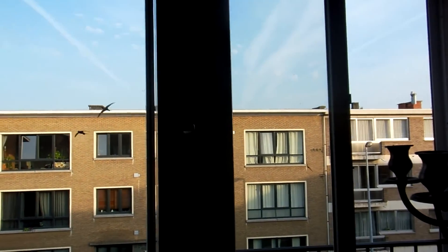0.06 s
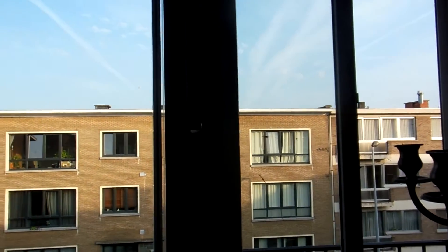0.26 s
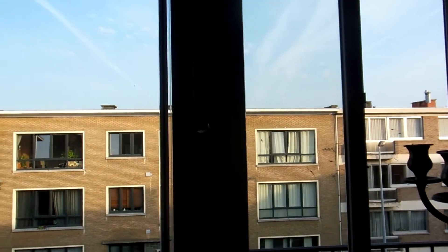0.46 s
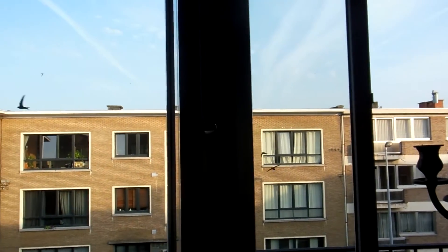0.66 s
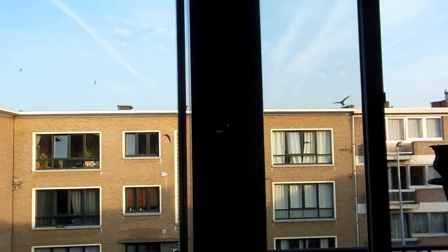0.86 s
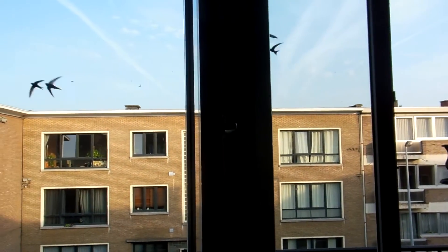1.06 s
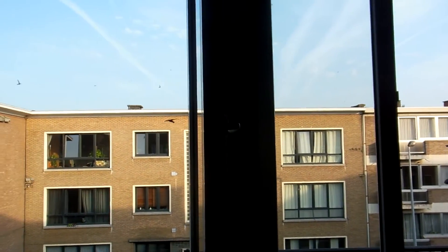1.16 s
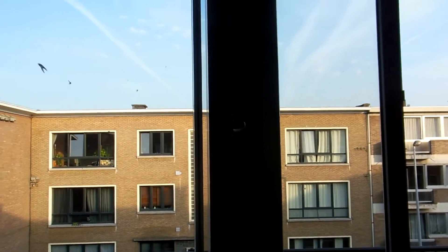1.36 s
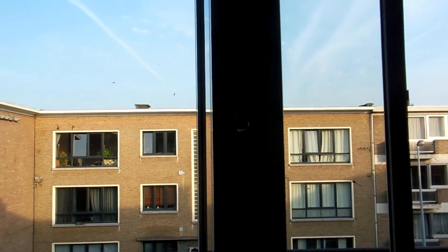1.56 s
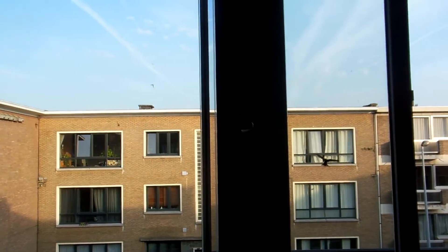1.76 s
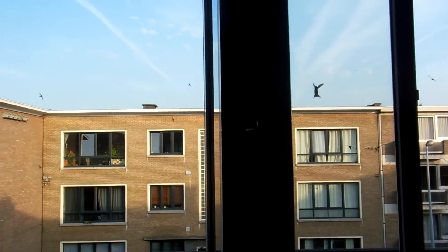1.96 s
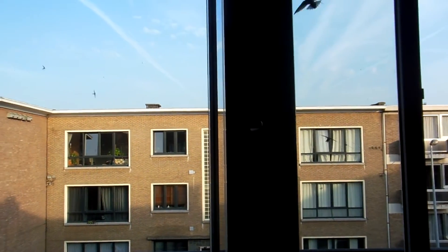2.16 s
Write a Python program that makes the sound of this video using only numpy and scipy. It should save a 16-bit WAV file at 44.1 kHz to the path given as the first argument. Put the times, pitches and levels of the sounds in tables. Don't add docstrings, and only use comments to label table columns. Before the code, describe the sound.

Shrill swift calls glide upward and turn rough, loudest in the first half second, fainter midway, strong again after, then a rapid chittering trill and a faint last cry. Stereo microphone at a window, echoing street, quiet steady rumble.

```python
import sys
import numpy as np
from scipy import signal
from scipy.fft import rfft, irfft
from scipy.io import wavfile
from scipy.ndimage import uniform_filter1d

SR = 44100
rng = np.random.default_rng(int(sys.argv[2]) if len(sys.argv) > 2 else 0)


def convert_level_to_amplitude(level_db):
    exponent = np.asarray(level_db, float) / 20
    return 10 ** exponent


def put_to_file(sound):
    columns = np.atleast_2d(sound).T
    safe = np.clip(columns, -1, 1)
    whole_steps = np.round(safe * 32767)
    wavfile.write(sys.argv[1], SR, whole_steps.astype(np.int16))


N = 97020
LEAD_IN = SR // 2
LEFT_RIGHT = np.array([[1], [-1]])


def level(x, db):
    return x * convert_level_to_amplitude(db) / np.sqrt(np.mean(x ** 2))


def walk(rate_hz, size):
    hold = int(SR / rate_hz)
    steps = np.repeat(rng.standard_normal(SR // 6), hold)[:size]
    return 1.3 * uniform_filter1d(uniform_filter1d(steps, hold), hold)


def hiss():
    band = signal.butter(2, [3800, 9300], "band", fs=SR)
    return level(signal.lfilter(*band, rng.standard_normal((2, N))), -64)


# (frequency [Hz], level [dB])
HUM = [
    (330, -71.5),
    (650, -71),
    (1402, -63),
    (13190, -77),
]


def machines(t):
    out = 0
    for hz, db in HUM:
        gain = np.sqrt(2) * convert_level_to_amplitude(db + 1.65 * walk(12.1, N))
        out = out + gain * np.sin(2 * np.pi * hz * t + .6 * walk(9.12, N))
    return out


# (frequency [Hz], density [dB per Hz])
TOWN = [(15, -61), (25, -20), (300, -9.5), (341, -9), (567, -5.5), (631, -5.5), (867, -7.5), (1350, -8.5),
        (4000, -17), (5200, -17), (8800, -120)]
# (frequency [Hz], correlation [0-1])
ALIKE = [
    (30, .92),
    (80, .86),
    (160, .73),
    (300, .71),
    (600, .78),
    (1300, .6),
    (2900, .36),
    (6000, .05),
]


def rumble():
    log_hz = np.log(np.arange(N // 2 + 1) * SR / N + 1)

    def read(rows):
        hz, value = np.transpose(rows)
        return np.interp(log_hz, np.log(hz), value)

    alike = read(ALIKE)
    mid, side = rfft(rng.standard_normal((2, N)))
    pair = np.sqrt(1 + alike) * mid + np.sqrt(1 - alike) * side * LEFT_RIGHT
    fall = convert_level_to_amplitude(-9 * np.clip(log_hz - np.log(TOWN[-1][0]), 0, None))
    noise = level(irfft(pair * convert_level_to_amplitude(read(TOWN)) * fall, N), -51.5)
    left_db, flicker_db = 0.9, 0.85
    return noise * convert_level_to_amplitude(flicker_db * walk(5, N)) * convert_level_to_amplitude(left_db * LEFT_RIGHT / 2)


def street(x):
    early_s, slap_s, slap_spread_s = .014, .114, .002
    tail_t60_s, treble_t60_s, treble_hz, tail_rise_s = 1.205, 1, 7260, 0.039
    t = np.arange(2 * SR) / SR
    grain = rng.standard_normal((3, 2, len(t)))

    def unit(h, db):
        return convert_level_to_amplitude(db) * h / np.sqrt(np.sum(h ** 2, axis=1, keepdims=True))

    sparse = grain[0] * (np.abs(grain[1]) > 2.8)
    early = sparse * np.exp(-t / early_s) * (t > .003)
    slap = grain[0] * np.exp(-((t - slap_s) / slap_spread_s) ** 2)
    low = signal.lfilter(*signal.butter(2, treble_hz, fs=SR), grain[2])
    tail = low * convert_level_to_amplitude(-60 * t / tail_t60_s) + (grain[2] - low) * convert_level_to_amplitude(-60 * t / treble_t60_s)
    tail = tail * (1 - np.exp(-t / tail_rise_s))
    echoes = unit(early, -2) + unit(slap, -4) + unit(tail, -2)
    return signal.fftconvolve(x[None], echoes, axes=1)[:, :len(x)]


HOARSE_HZ, BREATH_HZ = 907, 3000


def whistle(phase, lead_rad, pan_db, octave_db, husk, air):
    octave_left_db, three_halves_db, half_db, breath_db, hoarse = -1.5, -14, -38, -28, 0.77
    side = LEFT_RIGHT / 2
    p = phase + lead_rad * side
    upper = np.sin(2 * p) + convert_level_to_amplitude(three_halves_db) * np.sin(1.5 * p)
    upper = convert_level_to_amplitude(octave_db + octave_left_db * side) * upper
    husk = 1 + hoarse * np.array([husk, husk[::-1]])
    tone = (1 + convert_level_to_amplitude(breath_db) * air) * np.sin(p)
    tone = tone + husk * (upper + convert_level_to_amplitude(half_db) * np.sin(p / 2))
    return np.sqrt(2) * tone * convert_level_to_amplitude(pan_db * side)


# (time [s], pitch [Hz], level [dB])
TRILL = [(.975, 5070, -41.5), (1.005, 4560, -55), (1.069, 5440, -48), (1.099, 5020, -45),
         (1.737, 5646, -32.5), (1.759, 5724, -33), (1.782, 5520, -34.5), (1.808, 5670, -35),
         (1.831, 5380, -37), (1.856, 5260, -32.5), (1.881, 4600, -41.5), (1.883, 5010, -38.5),
         (1.905, 4600, -37.5)]


def trill(t):
    note_s, rise_hz, lead_rad, octave_db = 0.0069, 149, 0.93, -16.5
    out = np.zeros((2, len(t)))
    for s, hz, db in TRILL:
        on = (t > s) & (t < s + note_s)
        u = (t[on] - s) / note_s
        phase = 2 * np.pi * note_s * u * (hz + rise_hz * (u - 1) / 2)
        husk, air = walk(HOARSE_HZ, len(u)), walk(BREATH_HZ, len(u))
        swell = convert_level_to_amplitude(db) * np.sin(np.pi * u) ** .6
        out[:, on] += swell * whistle(phase, lead_rad, 0, octave_db, husk, air)
    return out


def scream(t, rows, buzz, rasp_hz, flutter_db, pan_db, lead_rad, octave_db):
    edge_s, buzz_onset_s, rasp_onset_s = .002, .07, .3
    buzz_hz, buzz_wander, jitter_hz, flutter_top = 280, .07, 20, .6
    s, hz, db = np.array(rows, float).T
    out = np.zeros((2, len(t)))
    on = np.abs(t - (s[0] + s[-1]) / 2) < (s[-1] - s[0]) / 2 + edge_s
    t = t[on]
    size = len(t)
    wander, flutter, jitter = walk(25, size), walk(95, size), walk(120, size)
    rasp, husk, air = walk(450, size), walk(HOARSE_HZ, size), walk(BREATH_HZ, size)

    grown = np.clip((t - s[0]) / buzz_onset_s, .25, 1)
    worn = np.clip((t - s[0]) / rasp_onset_s, .1, 1) ** 2
    chop = np.cumsum(buzz_hz * (1 + buzz_wander * wander)) * 2 * np.pi / SR
    gate = np.clip(np.minimum(t - s[0], s[-1] - t) / edge_s + 1, 0, 1)
    flutter = np.sqrt(grown) * flutter_db * np.minimum(flutter, flutter_top)
    gain = gate * convert_level_to_amplitude(np.interp(t, s, db) + flutter)
    gain = gain * (1 + 2 * buzz * grown * (np.sin(chop) + .2 * np.sin(2 * chop)))
    pitch_hz = np.interp(t, s, hz) + jitter_hz * jitter + rasp_hz * worn * rasp
    phase = np.cumsum(pitch_hz) * 2 * np.pi / SR
    phase = phase - .7 * buzz * grown * np.cos(chop)
    out[:, on] = gain * whistle(phase, lead_rad, pan_db, octave_db, husk, (1 + 2 * worn) * air)
    return out


# (time [s], pitch [Hz], level [dB])
NEAR_A = [
    (.158, 4300, -54),
    (.17, 4400, -44),
    (.2, 4450, -38),
    (.215, 4900, -31),
    (.229, 5150, -32),
    (.232, 5700, -50),
    (.235, 6280, -33),
    (.256, 6250, -35),
    (.269, 6300, -31),
]
NEAR_B = [
    (.273, 5700, -25),
    (.3, 6030, -22),
    (.342, 6460, -24),
    (.352, 6330, -29),
    (.368, 6380, -19),
    (.388, 6550, -25),
    (.42, 6230, -25),
    (.435, 6200, -36),
    (.462, 6150, -28),
]
NEAR_END = [
    (.47, 6210, -41),
    (0.521, 6388, -42),
    (0.581, 6314, -39),
    (0.636, 6400, -42.5),
]
FAR_C = [
    (.515, 4400, -64),
    (.54, 5000, -58),
    (.558, 5400, -46),
    (.58, 5450, -53),
    (.63, 5620, -48),
    (.65, 5650, -58),
]
FAR_D = [
    (.66, 5050, -49),
    (.69, 5400, -50),
    (.72, 5650, -43),
    (.78, 5750, -45),
    (.84, 5550, -50),
    (.92, 5750, -48),
    (1.02, 5780, -47),
    (1.06, 5600, -56),
    (1.15, 5700, -55),
]
MID_E = [
    (1.237, 4250, -64),
    (1.262, 5030, -44.5),
    (1.28, 5200, -39),
    (1.312, 5413, -33),
    (1.333, 5450, -42),
    (1.35, 5434, -32),
    (1.38, 5440, -36.5),
    (1.435, 5440, -32),
    (1.5, 5477, -39),
]
MID_F = [
    (1.377, 4424, -49),
    (1.4, 4900, -40.5),
    (1.43, 5250, -46),
    (1.5, 5750, -43.5),
    (1.561, 5900, -42),
    (1.61, 5847, -48),
    (1.659, 5600, -43),
    (1.72, 5800, -47.5),
]
LATE_G = [
    (2.075, 5220, -59),
    (2.1, 6200, -52.5),
    (2.123, 6630, -47.5),
    (2.159, 6830, -46.5),
    (2.2, 6990, -48.5),
]
PAST_H = [
    (-.4, 4600, -38),
    (-.3, 5730, -50),
    (-.15, 5990, -52),
    (-.05, 5600, -52.5),
    (0.021, 4590, -58.5),
    (.04, 4700, -74),
]
THIN_I = [
    (.04, 6680, -70),
    (.15, 6680, -63),
    (.19, 6670, -57),
    (.24, 6670, -60),
]
MID_J = [
    (1.512, 5100, -48),
    (1.535, 5550, -35),
    (1.553, 5600, -46),
    (1.563, 5720, -34),
    (1.578, 5400, -48),
    (1.615, 4800, -47),
    (1.65, 4700, -56),
]
# (flutter [dB], left minus right [dB], left phase lead [rad], octave [dB], street send [dB])
VOICES = [(3, 3, 0.77, -22, -9.5), (2, 1.5, 1.57, -26, -4.5), (-0.5, 1, 1.8, -43, -4),
          (-8, 4, 0.96, -19, 2.5), (-1, 2, 1, -21, -2), (5.5, 0.5, 0.9, -18, -7), (2, -1.5, 1.05, -17, 0.5),
          (2.5, 0, 0.89, -13.5, 2.5), (-1.5, 6, 1.25, -18.5, -4), (-6, 0, 2.1, -17, -23),
          (8.5, 1.5, 1.22, -14.5, -7.5)]
BUZZ = [.06, .16, .2, .12, .15, .24, .15, .17, .2, 0, .15]
RASP_HZ = [30, 110, 300, 400, 230, 190, 220, 120, 300, 0, 500]


def swifts(t):
    screams = NEAR_A, NEAR_B, NEAR_END, FAR_C, FAR_D, MID_E, MID_F, LATE_G, PAST_H, THIN_I, MID_J
    direct = trill(t)
    send = convert_level_to_amplitude(-5.5) * direct[0]
    for rows, buzz, rasp_hz, voice in zip(screams, BUZZ, RASP_HZ, VOICES):
        flutter_db, pan_db, lead_rad, octave_db, street_db = voice
        bird = scream(t, rows, buzz, rasp_hz, flutter_db, pan_db, lead_rad, octave_db)
        direct = direct + bird
        send = send + convert_level_to_amplitude(street_db) * bird[0]
    return direct + street(send)


def scene():
    t = np.arange(-LEAD_IN, N) / SR
    town = rumble() + hiss() + machines(t[LEAD_IN:])
    return town + swifts(t)[:, LEAD_IN:]


def low_pass(x):
    return signal.sosfilt(signal.butter(12, 14240, fs=SR, output="sos"), x)


def record(dry):
    return low_pass(dry)


dry = scene()
out = record(dry)
put_to_file(out)
```